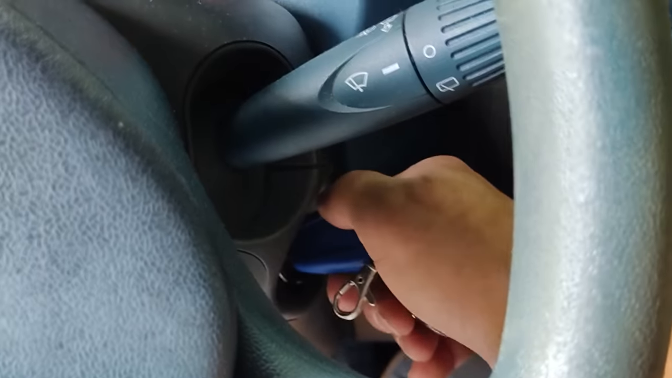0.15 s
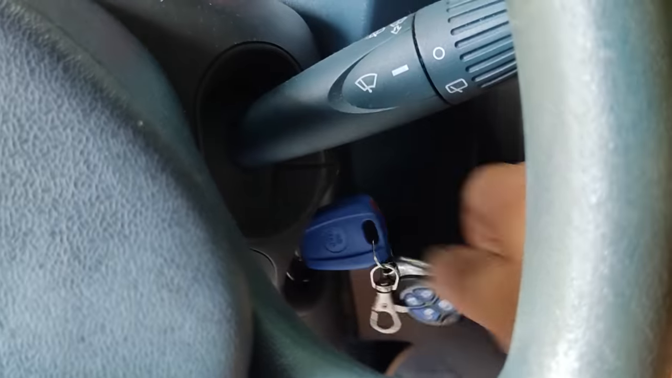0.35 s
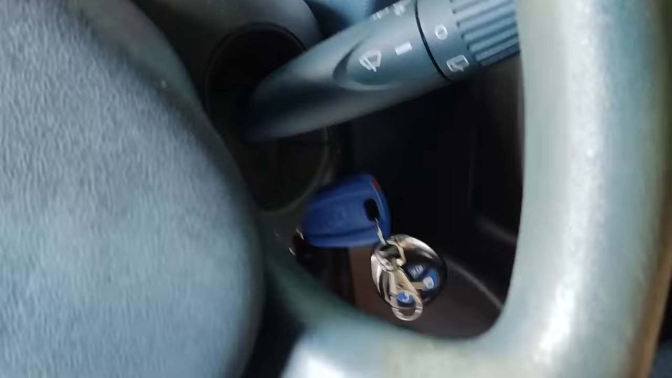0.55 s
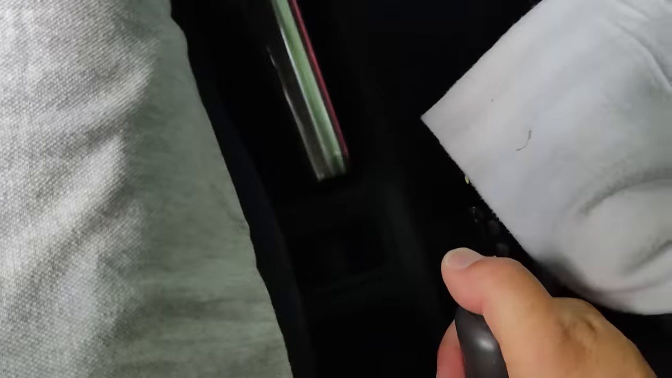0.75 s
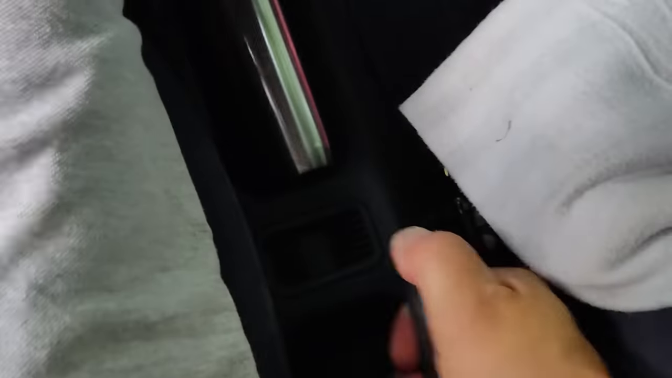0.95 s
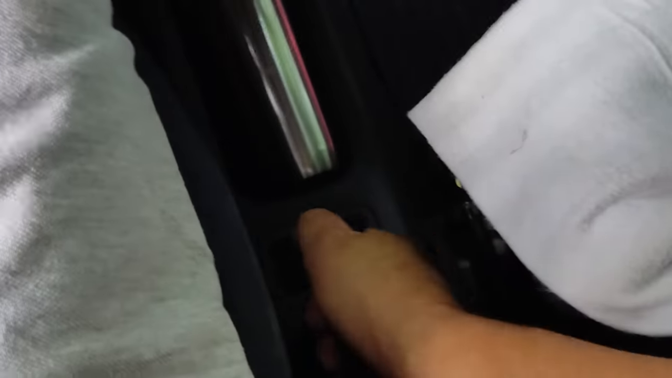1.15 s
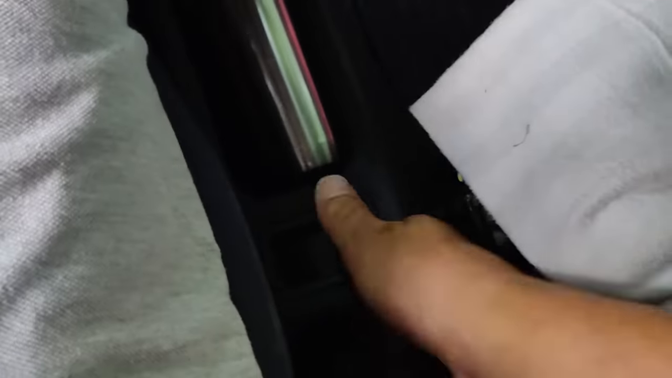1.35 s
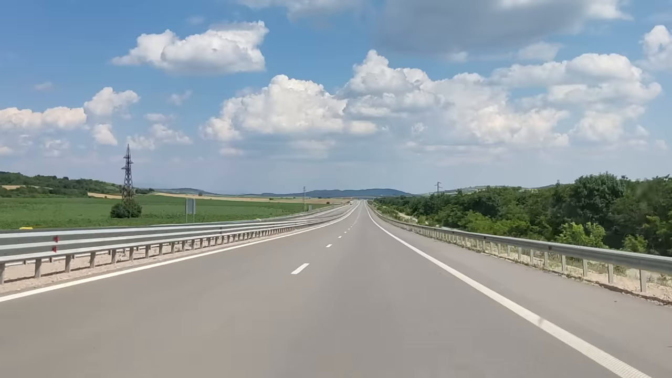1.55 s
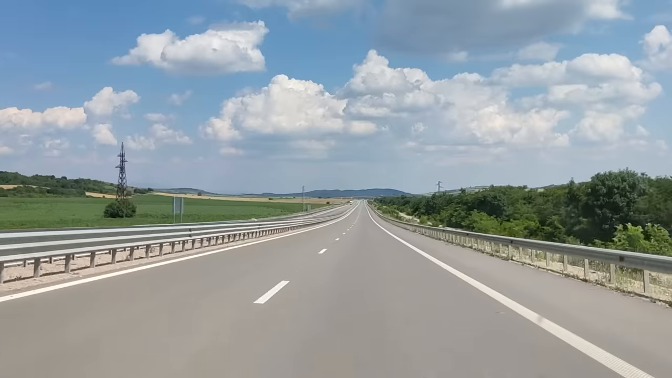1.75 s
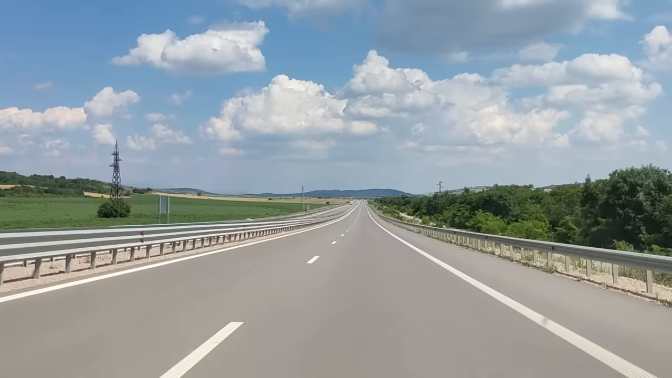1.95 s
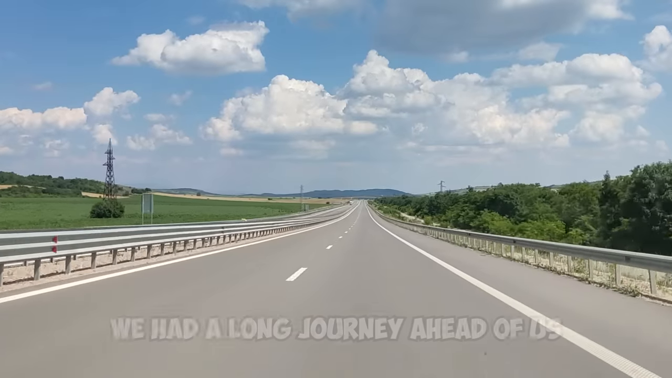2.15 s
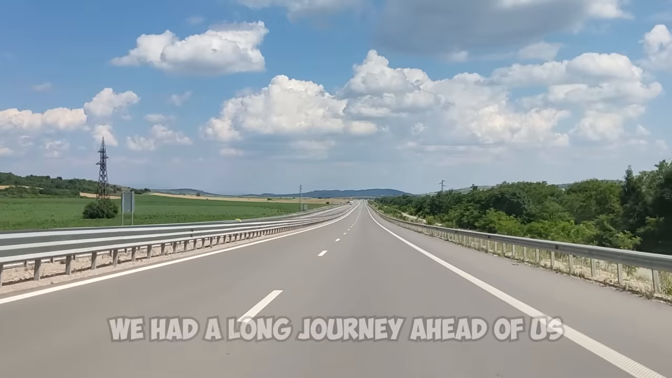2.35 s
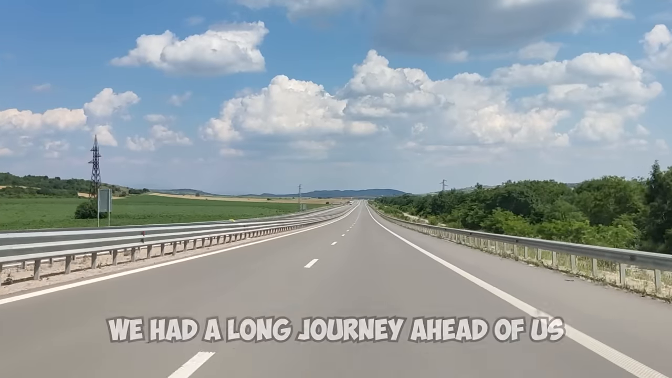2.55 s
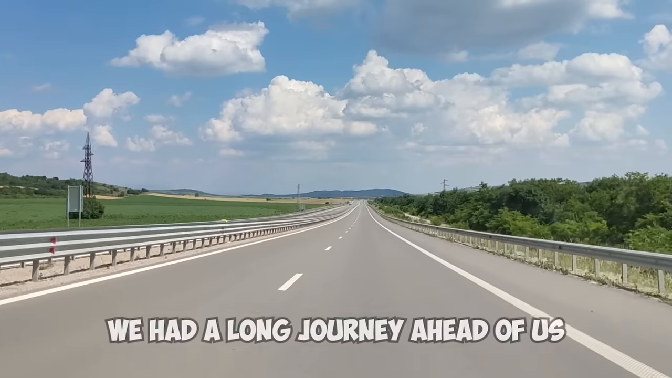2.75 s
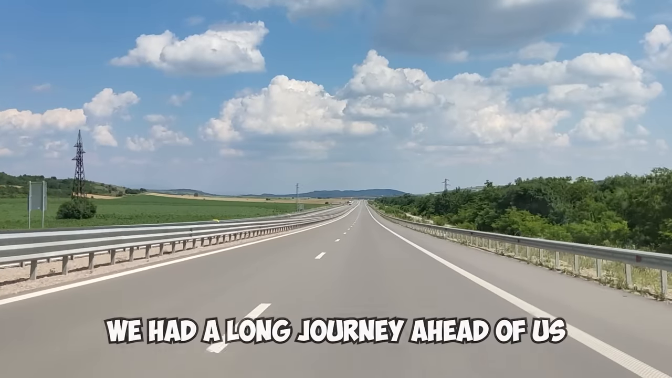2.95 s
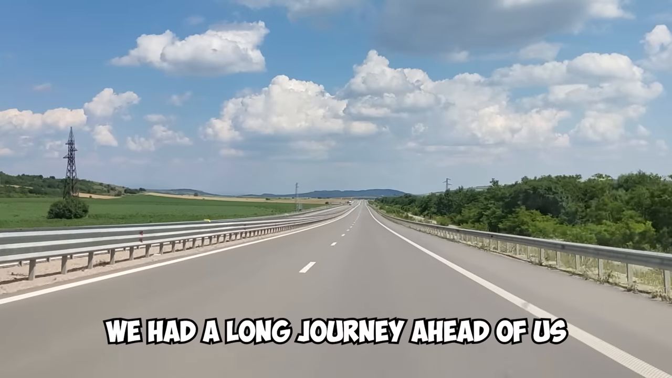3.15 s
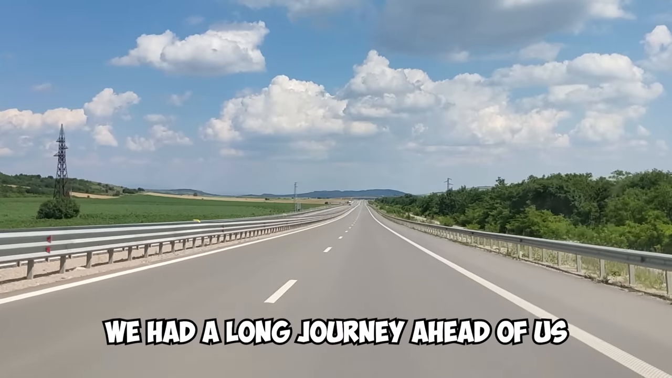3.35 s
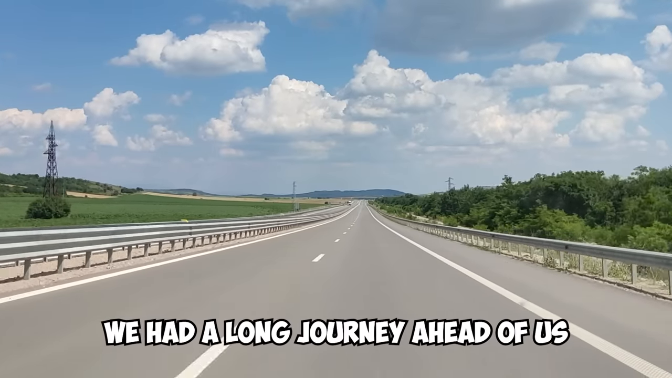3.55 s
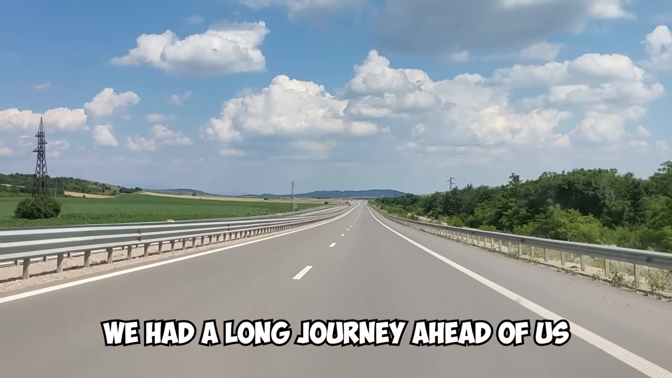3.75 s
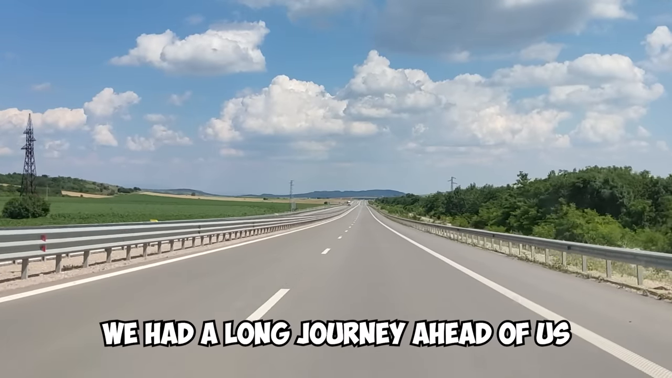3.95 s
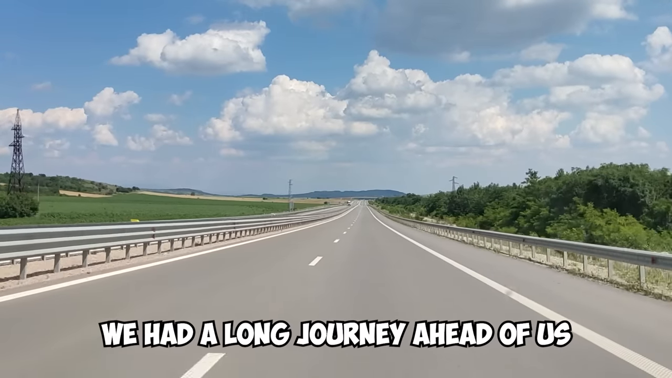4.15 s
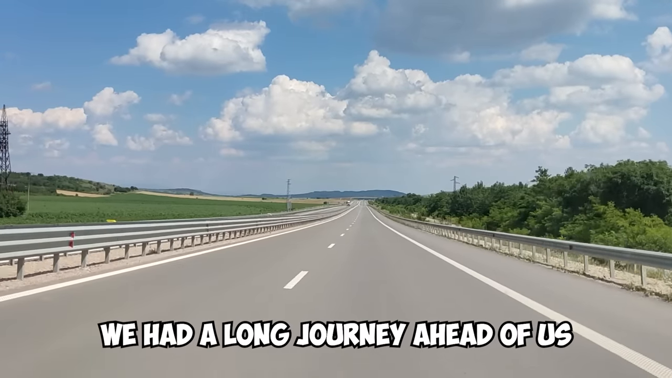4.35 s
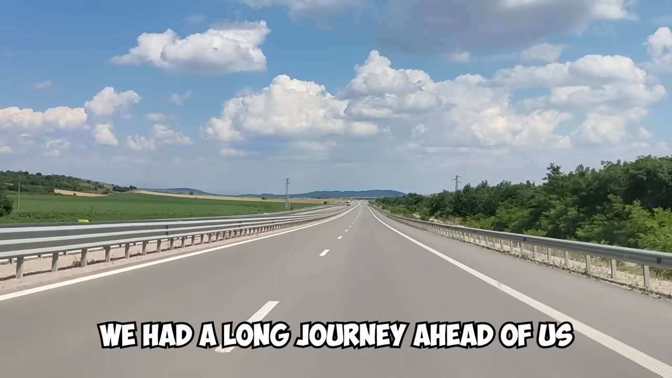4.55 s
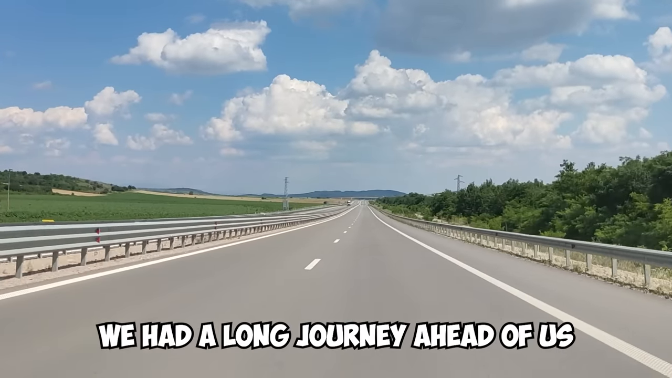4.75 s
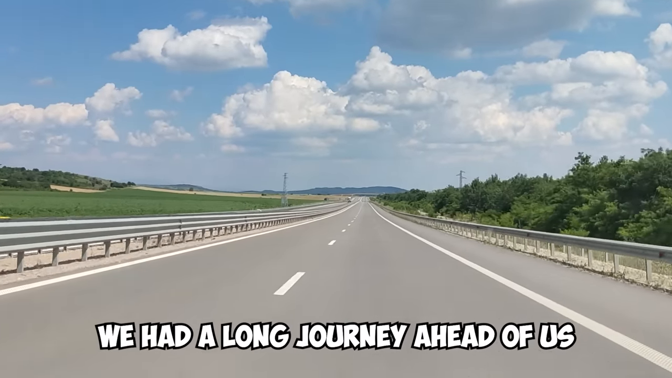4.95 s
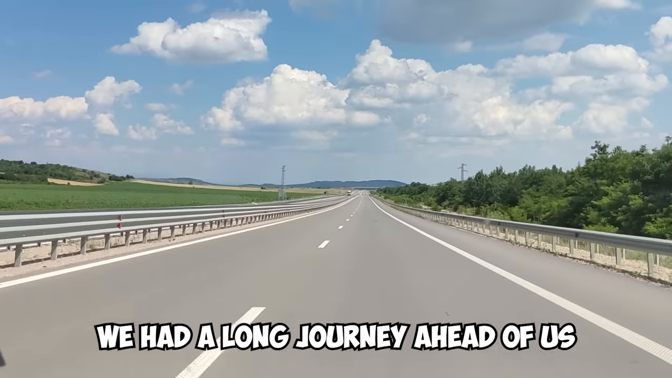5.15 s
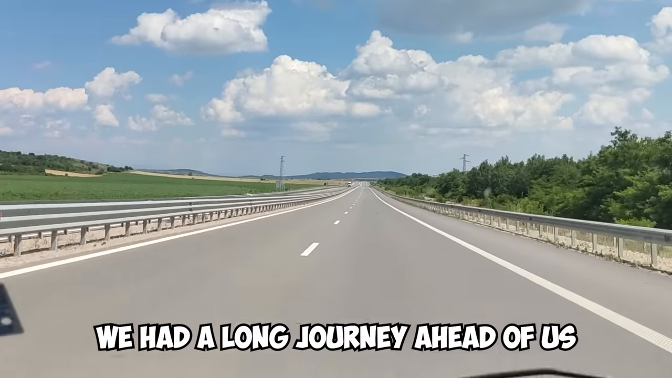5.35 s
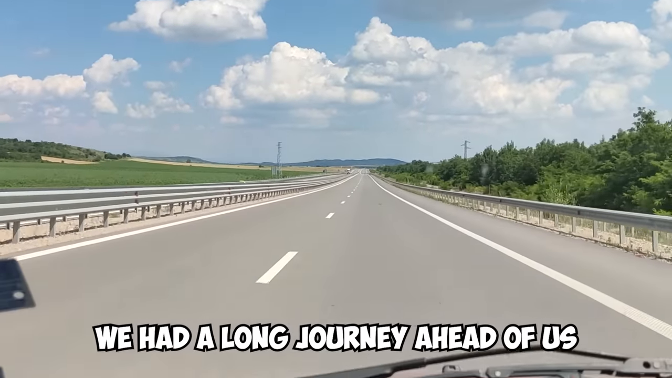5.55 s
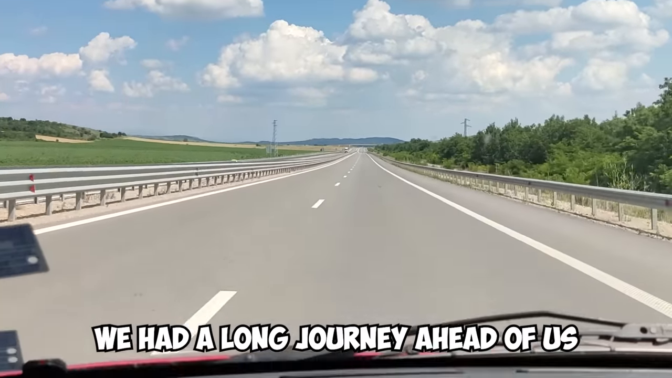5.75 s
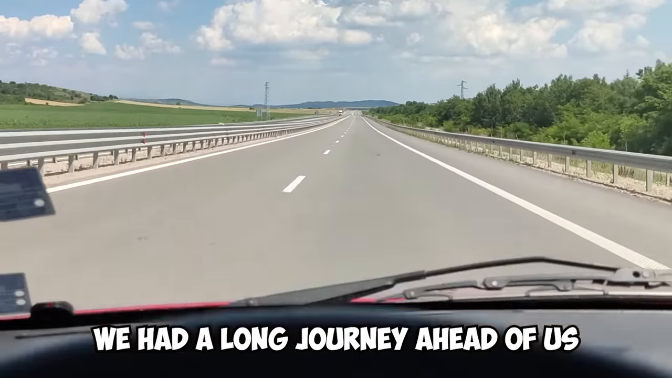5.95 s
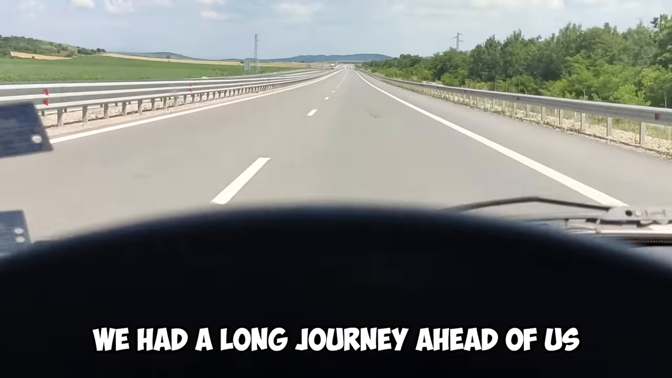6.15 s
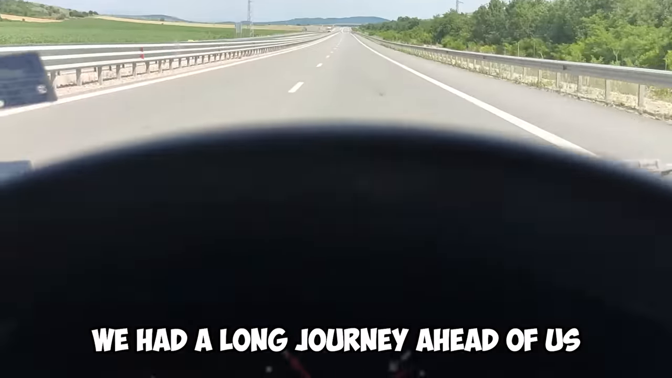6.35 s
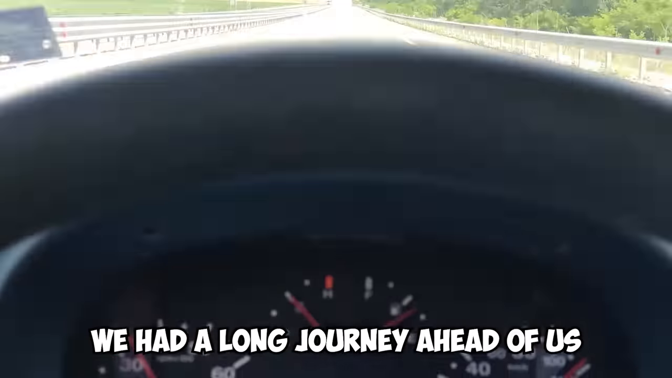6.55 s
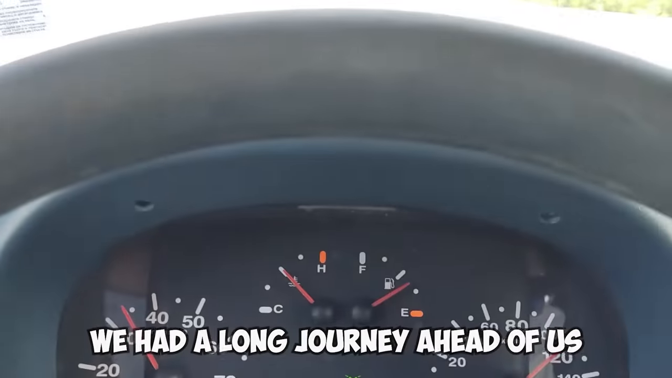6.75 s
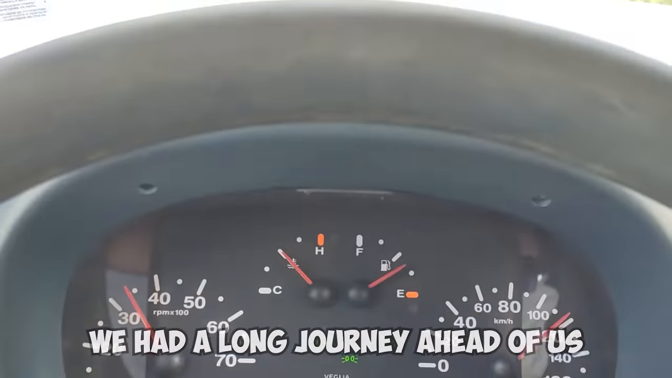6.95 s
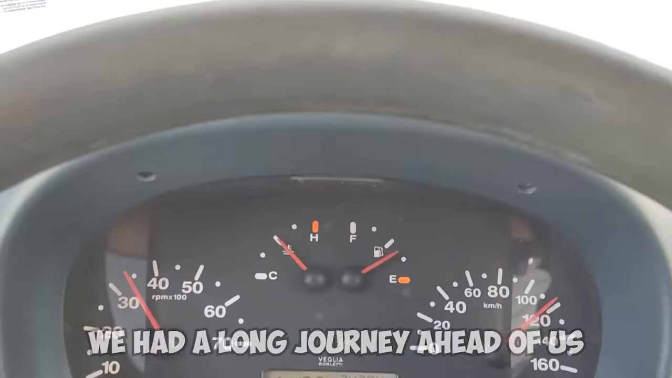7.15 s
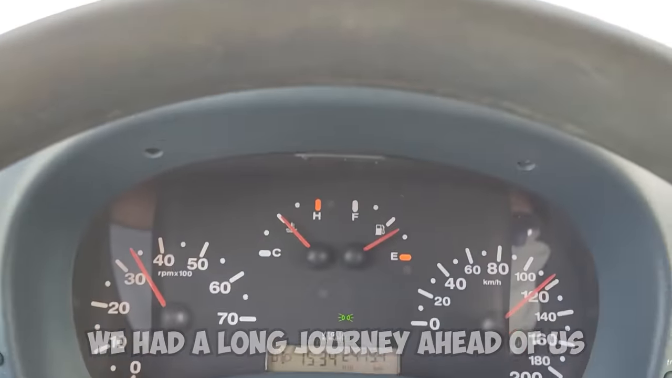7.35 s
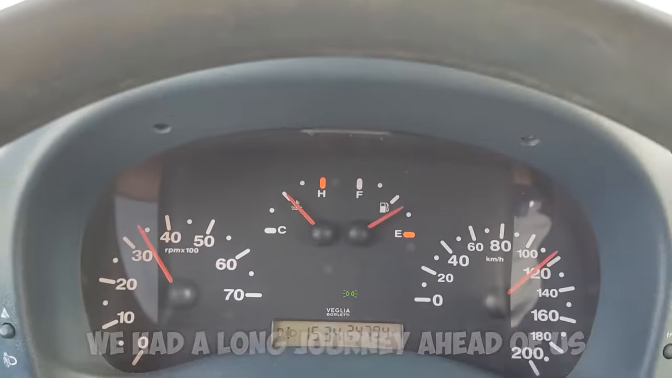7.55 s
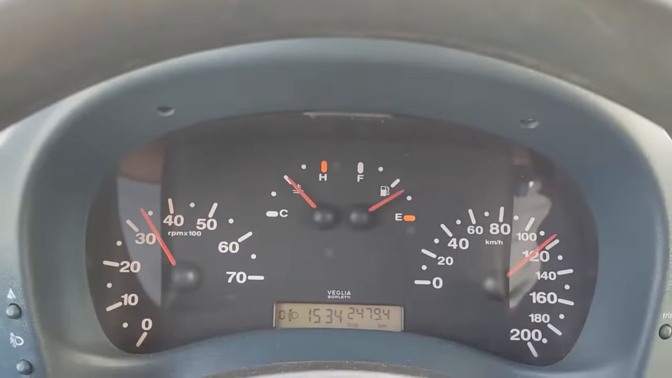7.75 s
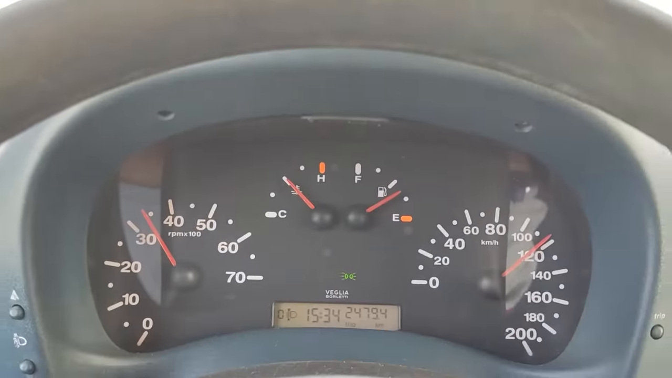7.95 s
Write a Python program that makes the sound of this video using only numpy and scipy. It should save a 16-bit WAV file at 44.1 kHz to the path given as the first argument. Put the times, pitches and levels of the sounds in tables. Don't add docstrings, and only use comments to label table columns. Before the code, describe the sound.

Stereo handheld pickup in a car cabin. First, bright metallic key clicks over a deep pressure-like starter thud and rumble, lasting about half a second. Then a steady low engine drone with a crisp handbrake click, sleeve rustle, a double hollow thump and a final click. Last, an abrupt change to long, soft road noise, mostly low rumble and humming engine, with thin airy hiss and a barely audible wavering whistle.

```python
import sys
import numpy as np
from scipy import signal
from scipy.fft import rfft, irfft, next_fast_len
from scipy.io import wavfile
from scipy.ndimage import uniform_filter1d

SR = 44100
rng = np.random.default_rng(int(sys.argv[2]) if len(sys.argv) > 2 else 0)


def decibels_to_gain(level_db):
    exponent = np.asarray(level_db, float) / 20
    return 10 ** exponent


def to_wav(s):
    ch = np.atleast_2d(s).T
    pcm = np.round(np.clip(ch, -1, 1) * 32767)
    wavfile.write(sys.argv[1], SR, pcm.astype(np.int16))


N = 352359
T = np.arange(N) / SR
M = next_fast_len(N)
HZ = np.maximum(np.arange(M // 2 + 1) * SR / M, 1)
CUT_IDLE_S, CUT_ROAD_S = .605, 1.501
PARKED = int(1.6 * SR)


def curves(table):
    s, *columns = np.transpose(table)
    return [np.interp(T, s, c) for c in columns]


def across(points):
    hz, value = np.transpose(points)
    return np.interp(np.log(HZ), np.log(hz), value)


def unit(x):
    return x / np.sqrt(np.mean(x ** 2))


def walk(rate):
    k = int(SR / rate)
    held = np.repeat(rng.standard_normal(N // k + 1), k)
    return 1.3 * uniform_filter1d(uniform_filter1d(held, k), k)[:N]


def swells(table):
    levels = [db - np.maximum(climb * (s - T), fall * (T - s)) for s, db, climb, fall in table]
    return np.max(levels, axis=0)


# (frequency [Hz], shared share of power [0-1])
PORT_LIKENESS = [(30, 0.95), (130, 0.77), (290, 0.76), (630, 0.89), (1400, 0.4), (3000, 0.054),
                 (7000, 0.067), (14000, .1)]
# (frequency [Hz], delay [samples])
PORT_DELAY = [(10, -9), (850, 13), (1200, 12.5), (2100, 22.5), (20000, 20.5)]


def port_noise():
    shared, left, right = rfft(rng.standard_normal((3, M)))
    alike = np.clip(across(PORT_LIKENESS), 0, 1)
    late = np.exp(-2j * np.pi * HZ * across(PORT_DELAY) / SR)
    common = np.sqrt(alike) * shared * np.array([late, late ** 0])
    return common + np.sqrt(1 - alike) * np.array([left, right])


def hiss(spectrum, lean=((1, 0), (2, 0))):
    colour_db = across(spectrum) + np.array([[.5], [-.5]]) * across(lean)
    return unit(irfft(port_noise() * decibels_to_gain(colour_db), M)[:, :N])


def modes(x, table):
    out = np.zeros(x.shape)
    for hz, t60, db in table:
        pole = np.exp(2j * np.pi * hz / SR - np.log(1000) / (t60 * SR))
        out[:, :PARKED] += decibels_to_gain(db) * signal.lfilter([1], [1, -pole], x[:, :PARKED]).imag
    return out


# (time [s], rocking [Hz], shudder [Hz])
STARTER_RATES = [(.1, 13, 33), (.24, 13, 33), (.28, 8, 33), (.37, 7, 33), (.41, 10, 33), (.45, 10, 33),
                 (.47, 10, 37.4), (.6, 10, 37.4)]
# (time of peak [s], level [dB], climb [dB/s], fall [dB/s])
BODY_HEAVES = [
    (0.0, -20, 300, 60),
    (.2, 2.5, 250, 254),
    (.44, -15, 13, 60),
    (.532, -10.5, 127, 400),
    (.6, -16, 170, 100),
]
ENGINE_SHUDDERS = [
    (.2, -25, 110, 200),
    (.282, -14.5, 400, 27),
    (.56, -20.5, 40, 25),
]
PANEL_RUMBLES = [
    (0.252, -22.5, 140, 46),
    (.12, -40, 40, 10),
    (0.51, -33, 15, 25),
]
HAND_RUSTLES = [
    (0.18, -48.5, 130, 200),
    (0.27, -40, 220, 99),
    (0.474, -52, 560, 81),
    (0.037, -61, 500, 5),
]
# (frequency [Hz], level [dB per Hz])
PANEL_COLOUR = [(29, -29), (50, -4.5), (87, -19.5), (163, -18), (200, -30), (250, -26), (329, -31.5),
                (532, -34), (3000, -60.5), (3900, -89), (6600, -120)]
HAND_COLOUR = [(880, -39.5), (1500, 1), (2070, -10), (2600, -3.5), (3330, -12.5), (3800, -8.5), (6050, -13),
               (10200, -4.5), (14500, -23)]


def starter():
    rock_turns, shudder_turns = np.cumsum(curves(STARTER_RATES), axis=1) / SR
    rock = -np.cos(2 * np.pi * (rock_turns - np.interp(.19, T, rock_turns)))
    shudder = -np.cos(2 * np.pi * (shudder_turns - np.interp(.598, T, shudder_turns)))
    motion = decibels_to_gain(swells(BODY_HEAVES)) * rock + decibels_to_gain(swells(ENGINE_SHUDDERS)) * shudder
    heave = .85 * np.tanh(np.sqrt(2) * motion / .85)
    panels = decibels_to_gain(swells(PANEL_RUMBLES) + 2.0 + 2.7 * walk(40.6)) * hiss(PANEL_COLOUR)
    hand = decibels_to_gain(swells(HAND_RUSTLES) + 4.0 + 2.0 * walk(92.5)) * hiss(HAND_COLOUR)
    return heave + panels + hand


# (frequency [Hz], level [dB per Hz])
CLICK_COLOUR = [(530, -39.5), (900, -14), (1250, -17.5), (1380, -15), (1850, -11.5), (2010, -12.5),
                (3810, -9.5), (4230, -9), (6280, -12), (8110, -6), (10300, -2), (12800, -10), (14500, -14)]
# (frequency [Hz], left minus right [dB])
HAND_SHADOW = [(1000, -14), (4000, -2), (7000, -7), (11000, 3), (14000, -1)]
# (frequency [Hz], t60 [s], level [dB])
METAL_MODES = [(8400, .03, -15), (4500, 0.038, -16.5), (10000, 0.023, -15), (7700, .02, -1.5),
               (11300, .02, -9)]


def clicks(events, pan_db):
    rattle, crack = np.zeros((2, 2, N))
    grain = decibels_to_gain(2.0 * walk(1200))
    colour = grain * hiss(CLICK_COLOUR, HAND_SHADOW)
    for s, db, scrape, fade, bright_hz in events:
        span = slice(int(s * SR), int(s * SR) + SR // 4)
        age = T[span] - T[span][0]
        side = decibels_to_gain(db + np.array([[pan_db], [-pan_db]]) / 2)
        after = np.maximum(age - scrape, 0)
        snap = (1 - np.exp(-age / 0.00054)) * np.exp(-after / 0.0034)
        echo_decay = np.exp(-np.log(1000) * after / np.clip(fade, .03, .2))
        tail = 0.77 * (1 - np.exp(-age / 0.0057)) * echo_decay
        broad = signal.lfilter(*signal.iirpeak(bright_hz, 2.5, SR), colour[:, span])
        ring = signal.lfilter(*signal.iirpeak(bright_hz, 45.0, SR), snap * colour[:, span])
        rattle[:, span] += 2.2 * side * ring
        rattle[:, span] += side * (snap + tail) * (0.75 * colour[:, span] + 1.65 * broad)
        crack[:, span] += side * snap
    metal = modes(crack * grain * rng.standard_normal((2, N)), METAL_MODES)
    return decibels_to_gain(-11.5) * rattle + decibels_to_gain(-33) * metal


def knocks(events, hollow):
    force = np.zeros((2, N))
    rough = rng.standard_normal(N) + 0.54 * rng.standard_normal((2, N))
    for s, db, contact, rattle in events:
        span = slice(int(s * SR), int(s * SR) + SR // 8)
        age = T[span] - T[span][0]
        keep = np.exp(-1 / (contact * SR / 3))
        blows = rough[:, span] * np.exp(-age / rattle)
        push = signal.lfilter([np.sqrt(1 - keep)], [1, -keep], blows)
        force[:, span] += decibels_to_gain(db + np.array([[-2.0], [2.0]])) * push
    return decibels_to_gain(-35) * modes(force, hollow)


# (time [s], peak level [dB], scrape before fading [s], fade [s], brightest frequency [Hz])
KEY_CLICKS = [
    (.054, -51.5, .025, 0.13, 9000),
    (.1825, -26, 0.0058, 0.094, 9600),
    (.2215, -38, 0.021, .12, 10000),
    (.2558, -36, 0.011, .12, 9000),
    (.2858, -8, 0.0033, 0.089, 8400),
    (.3371, -21.5, 0.0014, 0.1, 11000),
    (.4735, -37.5, 0.019, .07, 8900),
    (.518, -48, 0.0043, .08, 8600),
]
# (time [s], level [dB], contact [s], rattle [s])
COLUMN_BLOWS = [
    (.054, -34, 0.0002, 0.022),
    (.2255, -29.5, 0.00037, 0.017),
    (.248, -30, 0.0016, 0.013),
    (.2867, -30, 0.00082, 0.013),
]
# (frequency [Hz], t60 [s], level [dB])
COLUMN_MODES = [(111, 0.076, 4), (266, 0.039, -7), (400, 0.063, -2), (558, 0.059, -1), (1060, 0.026, -1),
                (1490, .03, -4), (1780, 0.039, -5)]


def key():
    return clicks(KEY_CLICKS, pan_db=-1) + knocks(COLUMN_BLOWS, COLUMN_MODES)


IDLE_HZ, FIRST_FIRING_S = 26.68, .6355
# (multiple of the firing rate, level [dB])
FIRING_ORDERS = [(1, -7), (2, 1), (5, -22), (6, -29.5), (8, -35)]
ORDER_LAGS = [.57, .45, .2, .7, .4]
# (frequency [Hz], width [Hz], level [dB])
VALVE_MODES = [(1890, 130, 0), (2500, 400, -11), (3600, 500, -10), (1450, 250, -10), (6500, 3000, -13)]
# (frequency [Hz], level [dB per Hz])
FAN_COLOUR = [(47, -30), (80, -4.5), (104, -18), (171, -19.5), (531, -18), (786, -33), (1320, -40.5),
              (1920, -36.5), (2140, -49), (2490, -42), (6070, -60), (8600, -54), (14500, -73.5)]
IDLE_DB, LOAD_S, LOAD_DB = -23, 1.14, 1.1
DUCK_S, DUCK_DB, DUCK_FALL_S, DUCK_BACK_S = 0.793, -10.5, 0.075, 0.053


def idle():
    duck = np.interp(T, [DUCK_S - DUCK_FALL_S, DUCK_S, DUCK_S + DUCK_BACK_S], [0, 1, 0])
    level_db = IDLE_DB + DUCK_DB * duck + LOAD_DB * (T > LOAD_S)
    turns = IDLE_HZ * (T - FIRST_FIRING_S)
    drone = 0
    for (k, db), lag in zip(FIRING_ORDERS, ORDER_LAGS):
        drone = drone + decibels_to_gain(db) * np.cos(2 * np.pi * (k * turns - lag))
    firing = np.floor(turns)
    size = decibels_to_gain(.8 * rng.standard_normal(256))[firing.astype(int) % 256]
    seat = np.diff(firing, prepend=0) > 0
    breath = np.exp(-(turns % 1) / .1) * irfft(port_noise(), M)[:, :N]
    puff = size * (12 * seat + breath)
    tick = modes(puff, [(hz, 1.7 / width, db) for hz, width, db in VALVE_MODES])
    fan = decibels_to_gain(0.8 * np.cos(4 * np.pi * (turns - .1))) * hiss(FAN_COLOUR)
    return decibels_to_gain(level_db) * (1.17 * drone + decibels_to_gain(-38.5) * unit(tick) + decibels_to_gain(-13.5) * fan)


# (time of peak [s], level [dB], climb [dB/s], fall [dB/s])
SLEEVE_SWELLS = [
    (.8, -62, 5, 3),
    (.955, -58, 220, 200),
    (1.07, -60, 80, 17),
    (1.17, -51.5, 40, 130),
    (1.335, -59, 700, 30),
    (1.5, -56, 210, 100),
]
# (frequency [Hz], level [dB per Hz])
CLOTH_COLOUR = [(900, -40), (1600, -16), (2600, -13), (4500, -15), (6500, -12), (8600, -7), (10500, -9),
                (14500, -21)]


def sleeve():
    return decibels_to_gain(swells(SLEEVE_SWELLS) + 2.0 + 2.2 * walk(60.9)) * hiss(CLOTH_COLOUR)


# (time [s], peak level [dB], scrape before fading [s], fade [s], brightest frequency [Hz])
BUTTON_CLICKS = [
    (.7395, -13, 0.0029, 0.05, 10400),
    (.7442, -6, 0.0019, 0.069, 10300),
    (1.3888, -6.5, 0.00091, 0.044, 8200),
]
LEVER_CLICKS = [
    (.6664, -42.5, 0.0028, .07, 6960),
    (1.1333, -25.5, 0.002, 0.053, 7600),
    (1.1775, -16.5, 0.0037, .12, 7250),
    (1.1890, -27, .01, 0.087, 7800),
    (1.2116, -17, 0.0016, 0.028, 7160),
    (1.331, -53, 0.032, .1, 8300),
    (1.4388, -23, 0.0036, 0.039, 7700),
]
# (time [s], level [dB], contact [s], rattle [s])
CONSOLE_BLOWS = [
    (.742, -29, 0.00028, 0.014),
    (1.1333, -40, .0003, 0.0044),
    (1.178, -16, 0.00015, 0.014),
    (1.1845, -12, 0.00055, 0.0048),
    (1.2125, -15, 0.00036, 0.0039),
    (1.222, -28, 0.0003, 0.0058),
    (1.439, -22, 0.0045, 0.0047),
    (1.449, -23.5, 0.01, 0.0054),
    (1.465, -42, 0.0008, 0.005),
]
# (frequency [Hz], t60 [s], level [dB])
CONSOLE_MODES = [(105, .06, 1), (270, 0.084, -20), (400, 0.04, -20), (504, 0.035, 4), (600, 0.026, 3),
                 (753, 0.034, 5), (820, 0.03, 5.5), (1030, 0.0096, -0.5), (1424, 0.0087, -6),
                 (2180, 0.033, -0.5), (2850, 0.024, -4)]


def handbrake():
    contacts = clicks(BUTTON_CLICKS, pan_db=-1.3) + clicks(LEVER_CLICKS, pan_db=-8.5)
    return contacts + knocks(CONSOLE_BLOWS, CONSOLE_MODES)


# (time [s], firing rate [Hz], level [dB])
BOOM_PATH = [(1.6, 111.1, -34), (3.49, 112.2, -32.5), (3.57, 113, -31.5), (7.92, 112.3, -32),
             (7.99, 111.6, -22)]
# (multiple of the firing rate, level [dB])
UPPER_ORDERS = [(2.5, -53), (2.75, -53), (3.25, -57), (4, -57), (4.75, -60), (5, -60)]


def boom(since, fade_db):
    boom_hz, boom_db = curves(BOOM_PATH)
    turns = np.cumsum(boom_hz * (1 + 0.0043 * walk(12))) / SR
    out = np.sqrt(2) * decibels_to_gain(boom_db + fade_db + 0.87 * walk(9)) * np.sin(2 * np.pi * turns)
    out = out + decibels_to_gain(-48 + fade_db + 2.4 * walk(2.94)) * np.sin(4 * np.pi * turns)
    sag_db = 1.3 * since
    for k, db in UPPER_ORDERS:
        level = decibels_to_gain(db + 2.0 + fade_db - sag_db + 2.6 * walk(4))
        out = out + level * np.sqrt(2) * np.sin(2 * np.pi * k * turns)
    return out


# (frequency [Hz], level [dB per Hz])
ROAD_COLOUR = [(6, -35), (10, 1.5), (43, -8.5), (62, -18.5), (85, -11.5), (125, -13.5), (162, -12),
               (255, -20), (310, -21), (430, -28), (480, -30), (680, -32), (1000, -31.5), (1200, -35.5)]
AIR_COLOUR = [(1400, -36), (1900, -39.5), (2400, -41.5), (3000, -46.5), (4100, -45.5), (5600, -51.5),
              (8800, -46), (11000, -48), (12000, -56), (13500, -48.5), (14300, -47)]
# (time of peak [s], level [dB], climb [dB/s], fall [dB/s])
ROAR_SWELLS = [
    (1.76, 3, 41, 40),
    (3.7, 1.18, 2, 1.0),
]
ROAR_DB, ROAR_SAG_DB_PER_S = -40.5, 0.1857


def roar(since, fade_db):
    roar_db = ROAR_DB + fade_db - ROAR_SAG_DB_PER_S * since + np.maximum(swells(ROAR_SWELLS), 0)
    rush = port_noise() * decibels_to_gain(across([*ROAD_COLOUR, *AIR_COLOUR]))
    swell, out = walk(1.56), 0
    for hz in 17.8 * 2 ** np.arange(11):
        octave = np.cos(np.pi / 2 * np.clip(np.log2(HZ / hz), -1, 1)) ** 2
        flicker = decibels_to_gain(0.45 * swell + 0.45 * walk(8))
        out = out + flicker * irfft(rush * octave, M)[:, :N]
    return decibels_to_gain(roar_db + 8.5) * unit(out)


# (frequency [Hz], width [Hz], level [dB])
DRONE_LINES = [(158.2, 5.2, -42), (306.8, 2.3, -51), (350.6, 2.4, -54), (286.2, 4.6, -53.5),
               (52.3, 16, -39), (383.4, 7, -53), (253, 2.4, -58.5)]


def drones(fade_db):
    lines = 0
    for hz, width, db in DRONE_LINES:
        lines = lines + decibels_to_gain(db) * np.sqrt(1 / width) / (1 + ((HZ - hz) / width) ** 2)
    hum = irfft(port_noise() * lines, M)[:, :N]
    return decibels_to_gain(19.0 + fade_db) * np.sqrt(2) * hum * np.sqrt(SR / 2) / 20


# (time [s], whistle [Hz])
SEAL_PITCH = [(1.5, 12200), (1.8, 11860), (3.13, 11900), (3.45, 12450), (3.9, 12600), (4.2, 12280),
              (4.72, 12000), (4.81, 12200), (4.95, 12050), (5.05, 12200), (5.75, 12000), (5.88, 12250),
              (6.3, 12160), (6.75, 12350), (6.85, 12100), (7.05, 12420), (7.4, 11800), (7.65, 12060)]
SEAL_REST_HZ, SEAL_DB, SEAL_DB_PER_KHZ, SEAL_FLUTTER_DB = 12000, -69, 17.5, 1.5


def door_seal(fade_db):
    seal_hz, = curves(SEAL_PITCH)
    speed_db = SEAL_DB_PER_KHZ * (seal_hz - SEAL_REST_HZ) / 1000
    seal_db = SEAL_DB + fade_db + speed_db + SEAL_FLUTTER_DB * walk(22)
    breathy = uniform_filter1d(rng.standard_normal((2, 2, N)), int(SR / 220))
    phase = 2 * np.pi * np.cumsum(seal_hz + 75 * walk(40)) / SR
    whistle = unit(breathy[0] * np.cos(phase) + breathy[1] * np.sin(phase))
    return decibels_to_gain(seal_db + 5.5) * whistle * decibels_to_gain(np.array([[2.5], [-4.0]]))


FADE_IN_S, FADE_POWER = 0.25, 0.78


def cruise():
    since = T - CUT_ROAD_S
    fade_db = 20 * FADE_POWER * np.log10(np.clip(since / FADE_IN_S, .05, 1))
    return boom(since, fade_db) + drones(fade_db) + roar(since, fade_db) + door_seal(fade_db)


# (frequency [Hz], share of lines dropped [0-1])
TREBLE_GAPS = [(2500, 0), (3500, .05), (4600, .1), (5000, .28), (5900, .24), (6600, .12), (7800, .02),
               (10800, .02), (11600, .12), (12200, .03), (13200, .42), (14200, .1)]
# (start [s], end [s], lower edge [Hz])
TOP_BAND_GAPS = [
    (3.55, 3.62, 13900),
    (3.76, 3.97, 13600),
    (4.03, 4.1, 13800),
    (7.02, 7.08, 13700),
]


def thin(x):
    hz, s, z = signal.stft(x, SR, nperseg=2048)
    luck = rng.random((206, z.shape[2] // 2 + 1))
    luck = np.repeat(np.repeat(luck, 5, axis=0), 2, axis=1)
    kept = luck[:len(hz), :z.shape[2]] > np.interp(hz, *np.transpose(TREBLE_GAPS))[:, None]
    kept[hz > 14260] = False
    for first, last, above_hz in TOP_BAND_GAPS:
        kept[np.ix_(hz > above_hz, (s > first) & (s < last))] = False
    return signal.istft(z * kept, SR, nperseg=2048)[1][:, :N]


def scene():
    top = signal.ellip(10, .2, 70, 14150, fs=SR, output="sos")
    moments = starter() + key(), idle() + sleeve() + handbrake(), thin(cruise())
    ignition, parked, road = (signal.sosfilt(top, x) for x in moments)
    closing = np.clip((CUT_ROAD_S - T) / .0015, 0, 1)
    return np.where(T < CUT_IDLE_S, ignition, closing * parked + (1 - closing) * road)


def roll_off(x):
    return signal.sosfilt(signal.butter(12, 15010, fs=SR, output="sos"), x)


def record(dry):
    dull = decibels_to_gain(across([(9000, 0.0), (11000, -9.5), (14000, -9.0)]))
    both = np.array([dry[0], irfft(rfft(dry[1], M) * dull, M)[:N]])
    mix = both / (1 + np.abs(both) ** 6) ** (1 / 6)
    return roll_off(mix)


dry = scene()
out = record(dry)
to_wav(out)
```